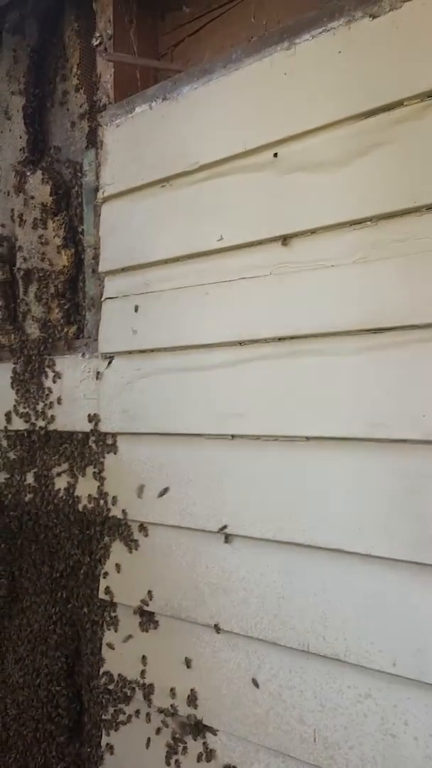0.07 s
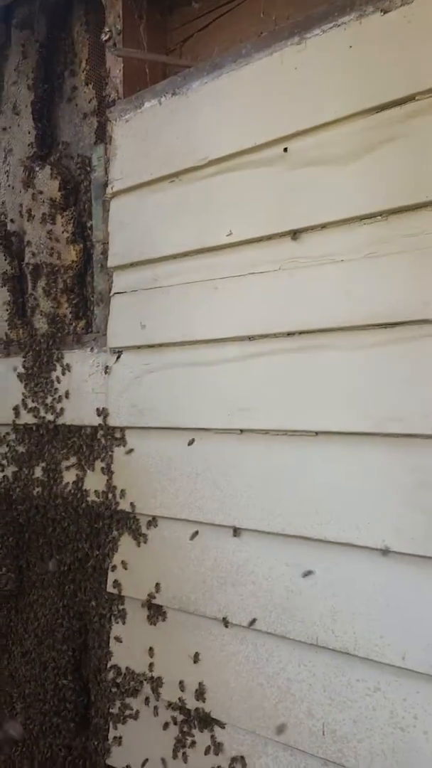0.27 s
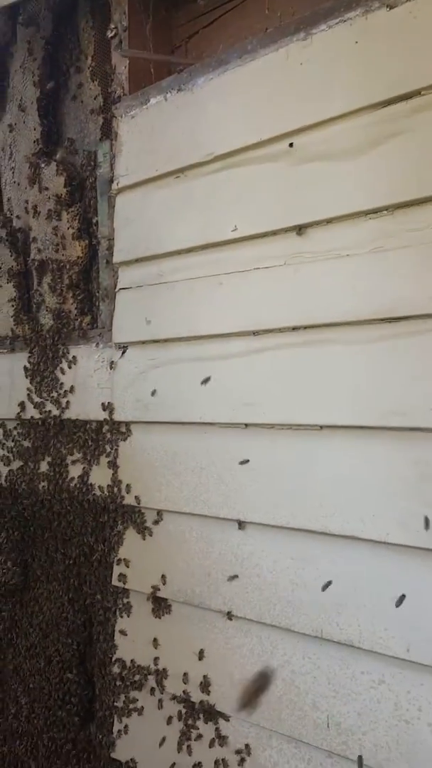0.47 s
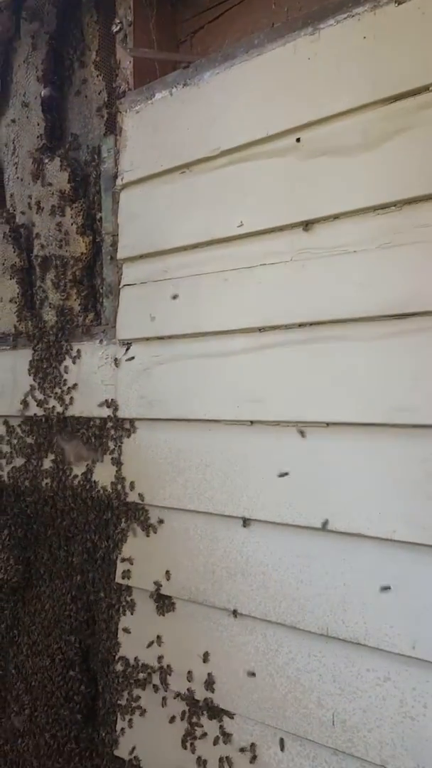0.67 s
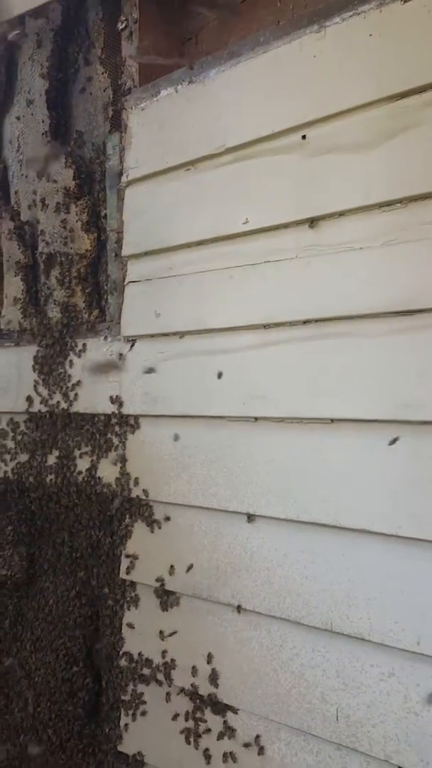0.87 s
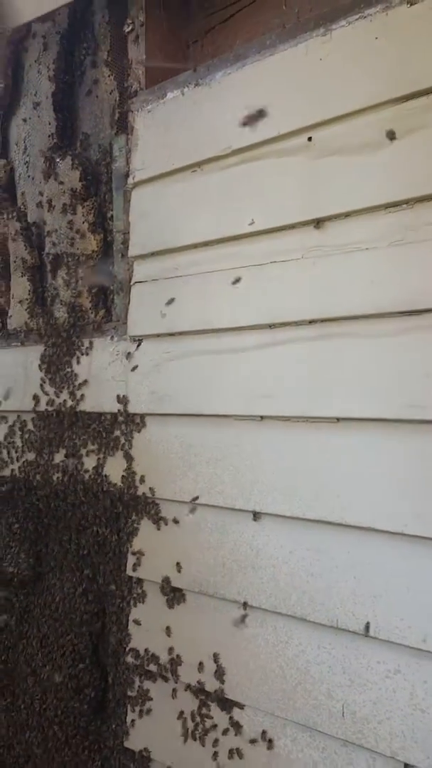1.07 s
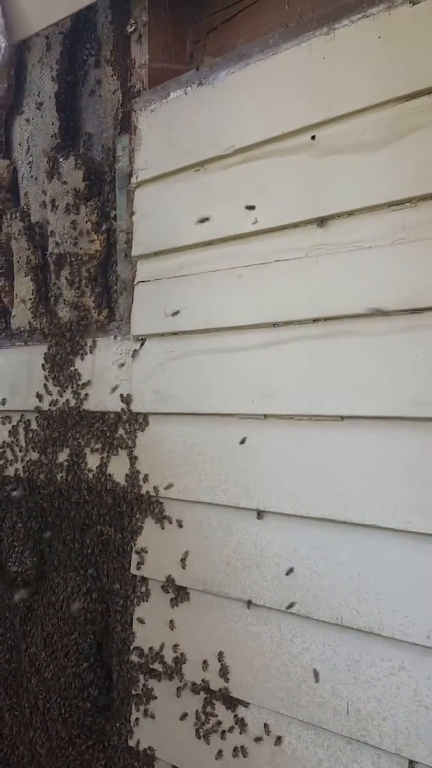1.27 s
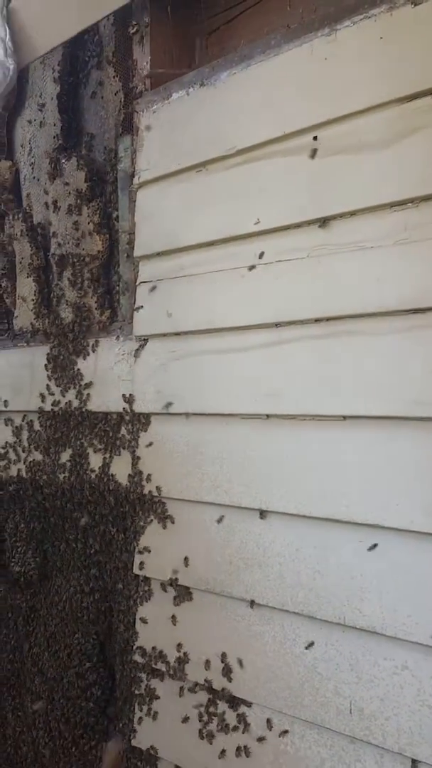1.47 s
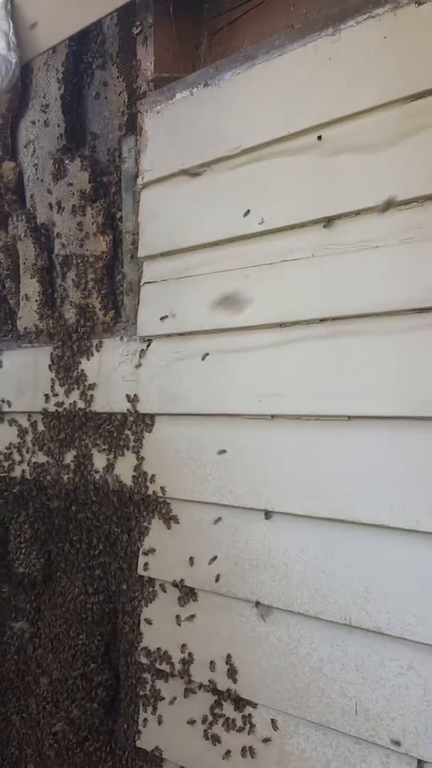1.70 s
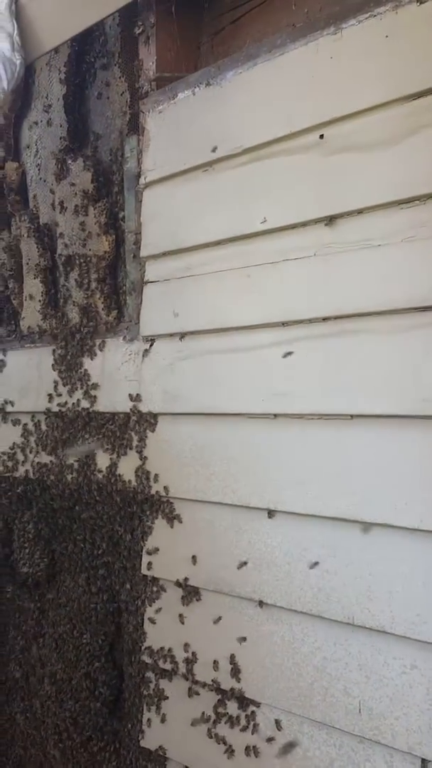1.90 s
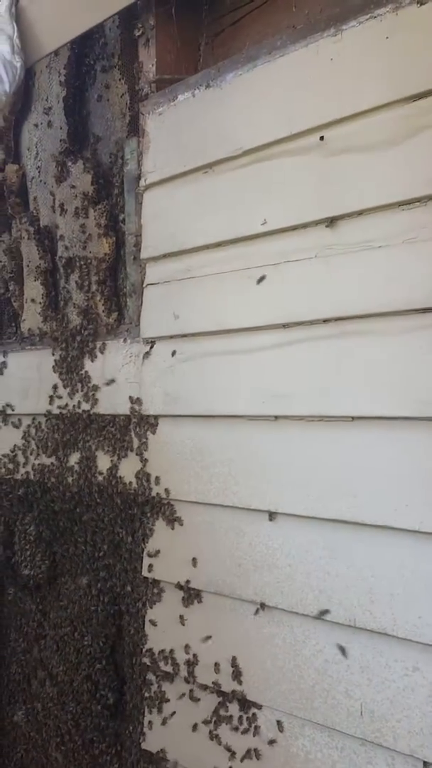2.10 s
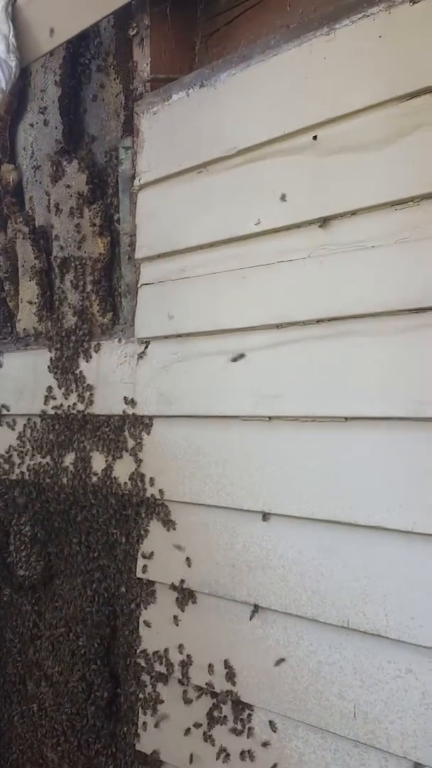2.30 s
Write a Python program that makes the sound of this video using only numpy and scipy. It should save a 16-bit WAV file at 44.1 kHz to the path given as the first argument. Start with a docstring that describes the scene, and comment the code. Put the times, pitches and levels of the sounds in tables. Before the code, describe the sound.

Bees buzzing close by, with sharp irregular taps and hollow thuds on a wooden wall.

```python
"""At the board wall of an old house, a honeybee swarm hums close by.
Wingbeats buzz over a rustle of wings and air and a distant rumble; single bees fly past.
Sharp, irregular taps and cracks of dry wood cut through. Heavier blows ring the boards and
make the hollow wall thud and boom; two end in gritty scrapes. The whole background dips after
heavy knocks, as under a recorder's gain control. The treble sits to the right."""
import sys
import numpy as np
from scipy.fft import rfft, irfft, next_fast_len
from scipy.io import wavfile
from scipy.ndimage import uniform_filter1d, map_coordinates

SR = 44100
rng = np.random.default_rng(int(sys.argv[2]) if len(sys.argv) > 2 else 0)


def digitize_waveform(pressure):
    """Quantize a signal to 16-bit integers and store it at the path in sys.argv[1].

    Rows of a 2-D input are taken as channels; values are limited to [-1, 1].
    """
    field = np.atleast_2d(pressure).T
    bounded = np.clip(field, -1, 1)
    quanta = np.round(bounded * 32767).astype(np.int16)
    wavfile.write(sys.argv[1], SR, quanta)


N = 108045
T = np.arange(N) / SR

# level of the whole background, dipping after heavy knocks: time_s, hum_rumble_gain_db, rustle_gain_db
BACKGROUND_LEVELS = [(0, -30.5, -46.5), (.11, -32.5, -44.5), (.2, -37, -45.5), (.42, -42, -43),
                     (.54, -43.5, -48), (.72, -43, -51), (.95, -44.5, -51.5), (1.15, -42, -52.5),
                     (1.28, -44, -48.5), (1.38, -39, -46.5), (1.45, -37, -47), (1.569, -45.5, -53),
                     (1.72, -47.5, -54), (1.9, -47, -55.5), (2.1, -47, -53), (2.3, -44, -49),
                     (2.45, -38, -46)]
# overtone envelope of one bee: freq_hz, level_db
BUZZ_SPECTRUM = [(230, 0), (420, 1.5), (510, 0), (660, -8), (850, -3), (1050, -11), (1300, -7.5),
                 (1800, -13), (2600, -29.5), (4000, -27), (6000, -24.5)]
# distant outdoor rumble: freq_hz, density_db
RUMBLE_SPECTRUM = [(20, -29), (45, -2), (75, 6), (130, 6.5), (180, -1), (400, -38)]
# rustle of wings and air: freq_hz, density_db
RUSTLE_SPECTRUM = [(100, -35), (300, 9), (700, 10.5), (1500, 6), (2600, 0), (5000, -4.5), (7400, -2),
                   (8300, -9.5), (9400, -15.5), (10500, -11.5), (12000, -2.5), (15600, -6.5)]
# pan of rumble and rustle: freq_hz, left_minus_right_db
AIR_PAN = [(100, 0.5), (700, 1.5), (2400, -2.5), (4400, -13), (8000, -8.5), (15000, -18)]
# left-right likeness of rumble and rustle: freq_hz, correlation
AIR_CORRELATION = [(60, 1), (300, 0.77), (700, -0.32), (1400, -0.39), (3000, 0.26), (15000, -0.18)]
# passing bees: nearest_s, half_amplitude_s, wingbeat_hz, peak_db
BEE_PASSES = [(0.062, 0.052, 202.3, -42.5), (.09, 0.096, 246.7, -43), (.93, 0.054, 223.2, -54),
              (1.38, 0.067, 239.5, -45.5), (1.769, 0.056, 254, -58), (1.99, 0.074, 259, -51.5),
              (2.22, 0.1056, 220.8, -48), (2.42, 0.081, 261.5, -50.5)]
# taps: start_s, contact_s, snap_db, tilt_db_per_octave, clack_db, resonance_hz, resonance_db, ring_db
TAP_EVENTS = [(0.2329, 0.0056, -16.5, 1.5, -34, 6670, 6.5, -25.5),
              (0.2841, .005, -27.5, 2.5, -35.5, 1180, 12, -40),
              (0.3587, 0.0032, -23.5, 6, -29, 1060, 2, -39), (0.422, 0.0038, -33, 8, -53, 1800, 2, -54),
              (0.4343, 0.00633, -12.5, 0, -11, 710, 6.5, -14.5),
              (.5382, .004, -30, 2.5, -36, 1350, 14.5, -41.5), (0.572, 0.0028, -36, 6.5, -46, 1800, 3, -61),
              (0.693, .003, -33.5, 7.5, -55, 1780, 7, -52), (0.7237, 0.0036, -31, 3.5, -42, 2200, 6, -39),
              (0.751, 0.0074, -30, 9.5, -47, 1800, -1, -60),
              (0.7681, 0.0024, -13.5, 0.5, -13.5, 1300, 13, -25),
              (0.8548, 0.0055, -24, 9, -38.5, 2020, 7, -31.5),
              (0.864, 0.007, -30.5, -1, -29.5, 1320, 15.5, -34.5),
              (1.0862, 0.0089, -39.5, 1, -33.5, 1160, 13.5, -43),
              (1.1096, 0.0022, -21, 0, -19, 1930, 16, -56),
              (1.1131, 0.0017, -12.5, -1.5, -18.5, 1470, 1, -21),
              (1.162, 0.0025, -32.5, 7.5, -39, 1800, 0, -37),
              (1.1977, 0.0026, -28, 7.5, -53, 1800, 7, -36.5),
              (1.2339, 0.0061, -31.5, 4, -25, 1540, 11, -33),
              (1.2625, 0.0035, -27, 6, -33, 2170, 10, -37.5),
              (1.3282, 0.0058, -30, 1, -30, 1870, 8.5, -38.5),
              (1.3576, 0.0056, -31, 5.5, -32, 2440, 20, -32.5),
              (1.3798, 0.0055, -32.5, 7.5, -33, 2420, 4, -40), (1.4, 0.0069, -36.5, 10, -43, 2440, 14, -37),
              (1.4646, 0.0025, -16.5, 4, -23.5, 2820, 13, -23.5),
              (1.4665, 0.0041, -14.5, 1.5, -8, 1980, 13.5, -26),
              (1.725, 0.0024, -36.5, 16.5, -49, 1780, 16, -44),
              (2.277, 0.0058, -44, 11, -44, 1800, 7, -67.5), (2.367, 0.0024, -46, 5, -59, 1800, 6, -46),
              (2.432, 0.0045, -41, 4, -54, 1800, -3, -58)]
# bright snap: freq_hz, density_db
SNAP_SPECTRUM = [(100, -16), (300, -27), (1500, -10.5), (3000, 1.5), (4300, 4.5), (5200, 1), (6300, 3),
                 (7600, 4.5), (8600, -7), (9800, -10), (12500, -5.5), (15800, -7)]
# woody clack: freq_hz, density_db
CLACK_SPECTRUM = [(30, -40), (70, -23), (140, -18), (270, 4.5), (650, 0), (1000, -3.5), (2300, -3.5),
                  (4000, -22), (9000, -38.5)]
# wood ringing or scraped: freq_hz, density_db
WOOD_SPECTRUM = [(60, -30), (150, 9.5), (500, 3), (1100, 4), (2000, 3.5), (3500, -1), (5000, -2.5),
                 (7400, -1.5), (9600, -16.5), (12500, -4.5), (15800, -9.5)]
# pan of wood noises: freq_hz, left_minus_right_db
WOOD_PAN = [(100, 0.5), (600, 2.5), (1300, -4.5), (2500, 1), (5000, -6.5), (8000, -12), (14000, -11.5)]
# left-right likeness of wood noises: freq_hz, correlation
WOOD_CORRELATION = [(60, 1), (300, 0.85), (700, 0.4), (1400, 0.14), (2100, 0.22), (4000, 0.19), (15000, 0)]
# blows on the wall: start_s, modes_db, pitch_ratio, swell_s, rattle_db, boom_db
THUD_EVENTS = [(.238, -51, 1.05, 0.0037, -47, -51), (.437, -8.5, 1, 0.0077, -13, -24.5),
               (.52, -61, 0.88, 0.006, -48, -33.5), (.785, -20, 1.17, 0.0059, -26, -27.5),
               (0.865, -31.5, 1.1, 0.0038, -37, -40), (1.113, -23, .78, 0.014, -22.5, -51),
               (1.235, -34.5, 1.15, 0.0015, -28, -54), (1.47, -10, 1.04, 0.015, -14.5, -24.5)]
# board modes: base_hz, level_db, t60_s
BOARD_MODES = [(132.5, -16.5, 0.29), (175, -13, 0.13), (220.7, -0.5, .16), (293.6, -9, 0.15),
               (331.5, -6, 0.1), (405, -17.5, 0.11), (481, -12, 0.12), (562.3, -10.5, 0.14),
               (633, -6, 0.08), (709, -11, 0.046)]
# rattle of the hollow: freq_hz, density_db
RATTLE_SPECTRUM = [(25, -42), (50, -31), (110, -7), (170, 1), (330, 2), (600, -4), (800, -9), (1300, -27),
                   (3000, -40)]
# boom of the wall: freq_hz, density_db
BOOM_SPECTRUM = [(20, -29), (42, -25), (68, 1), (95, -3.5), (125, -4), (220, -26), (500, -75)]
# scrapes after a blow: centre_s, sigma_s, peak_db
SCRAPE_EVENTS = [(0.804, 0.03, -33.5), (0.843, 0.021, -44.5), (1.494, 0.018, -30.5), (1.541, 0.022, -47)]


def amp(db):
    """Decibels to gain."""
    return 10 ** (np.asarray(db) / 20)


def unit(x):
    """Scale to rms 1."""
    return x / np.sqrt(np.mean(x ** 2) + 1e-20)


def along(points, hz):
    """Interpolate (freq_hz, value) points on a log axis."""
    freq_hz, values = np.transpose(points)
    return np.interp(np.log(hz + 1), np.log(freq_hz + 1), values)


def wobble(rate_hz, size=N):
    """Smooth random curve, rate_hz knots a second."""
    knots = rng.standard_normal(N // 8)[:int(size * rate_hz / SR) + 4]
    coarse = np.arange(0, size + 8, 8)
    spline = map_coordinates(knots, [coarse * rate_hz / SR], mode="nearest")
    return np.interp(np.arange(size), coarse, spline)


def noise(spectrum, pan=WOOD_PAN, correlation=WOOD_CORRELATION, envelope=np.ones(N),
          peak_hz=1000, peak_db=0, tilt_db=0, width_octaves=.19):
    """Stereo noise, rms 1, bunched under an envelope; optional resonance, tilt per octave above 1 kHz."""
    m = next_fast_len(len(envelope), True)
    hz = np.fft.rfftfreq(m, 1 / SR)
    resonance = np.exp(-.5 * (np.log2((hz + 1) / peak_hz) / width_octaves) ** 2)
    db = along(spectrum, hz) + peak_db * resonance + tilt_db * np.log2(np.maximum(hz / 1000, 1))
    bunched = envelope * rng.standard_normal((2, len(envelope)))
    white = np.exp(1j * np.angle(rfft(bunched, m)))
    spread_rad = np.arccos(np.clip(along(correlation, hz), -1, 1)) / 2
    mid, side = white * amp(db) * [np.cos(spread_rad), np.sin(spread_rad)]
    gains = amp(along(pan, hz) * np.array([[.5], [-.5]]))
    gains /= np.sqrt(np.mean(gains ** 2, axis=0))
    return unit(irfft(np.array([mid + side, mid - side]) * gains, m)[:, :len(envelope)])


def burst(spectrum, envelope, **colour):
    """Coloured noise burst with the envelope's energy."""
    sound = noise(spectrum, envelope=envelope, **colour) * envelope ** .31  # trims the smeared tail
    return unit(sound) * np.sqrt(np.mean(envelope ** 2))


def fade(t, swell_s, t60_s):
    """Swell, then exponential decay."""
    return (1 - np.exp(-t / swell_s)) * np.exp(-np.log(1000) * t / t60_s)


def add(track, start_s, sound):
    """Mix a sound into the track."""
    part = track[:, round(start_s * SR):][:, :sound.shape[-1]]
    part += sound[..., :part.shape[1]]


def buzz(pitch_hz, bend, jitter=.0098, lag_spread_s=.0003, harmonics=24, size=2048):
    """One bee, rms 1: a harmonic wingbeat that bends and jitters, reaching one side first."""
    k = np.arange(1, harmonics + 1)[:, None]
    phases = k * np.arange(size) / size + rng.random((harmonics, 1))
    beat = unit(np.sum(amp(along(BUZZ_SPECTRUM, k * pitch_hz)) * np.sin(2 * np.pi * phases), axis=0))
    cycles = np.cumsum(pitch_hz * (1 + bend + jitter * wobble(60))) / SR
    lag_cycles = pitch_hz * lag_spread_s * rng.normal() * np.array([[.5], [-.5]])
    return beat[((cycles + lag_cycles) * size).astype(int) % size]


def bees(count=22, wingbeat_hz=233, spread=.09, drift=.045):
    """Many bees, each with its own wandering wingbeat; the sum is held at a steady level."""
    out = np.zeros((2, N))
    for rank in (np.arange(count) + .5) / count:
        pitch_hz = wingbeat_hz * (1 + spread * np.log(rank / (1 - rank)) / 2)
        out += buzz(pitch_hz, drift * wobble(rate_hz=5))
    power = uniform_filter1d(np.mean(out ** 2, axis=0), size=8192)
    return unit(out / np.sqrt(power))


def background():
    """Swarm hum, rumble and rustle; set gain curves dip after heavy knocks, then slowly recover."""
    time_s, hum_rumble_gain_db, rustle_gain_db = np.transpose(BACKGROUND_LEVELS)
    hum = amp(-4.5) * bees() * amp([[1], [-1]])  # slightly left
    rumble = amp(-14) * noise(RUMBLE_SPECTRUM, AIR_PAN, AIR_CORRELATION)
    rustle = amp(5 + .91 * wobble(70)) * noise(RUSTLE_SPECTRUM, AIR_PAN, AIR_CORRELATION)
    hum_rumble_gain = amp(np.interp(T, time_s, hum_rumble_gain_db))
    rustle_gain = amp(np.interp(T, time_s, rustle_gain_db))
    return hum_rumble_gain * (hum + rumble) + rustle_gain * rustle


def fly_bys(doppler=.02):
    """Near bees swell and fade, sharp on approach and flat on leaving."""
    out = np.zeros((2, N))
    for nearest_s, half_amplitude_s, wingbeat_hz, peak_db in BEE_PASSES:
        position = (T - nearest_s) / half_amplitude_s
        bend = -doppler * position / np.hypot(1, position)
        out += amp(peak_db) / (1 + position ** 2) * buzz(wingbeat_hz, bend)
    return out


def taps(attack_s=.00054, release_t60_s=.0084, splinter_db=1.1, size=2048):
    """Milliseconds of splintery contact: bright snap and woody clack, then a short ring."""
    out, t = np.zeros((2, N)), T[:size]
    tail = fade(T[:SR // 4], swell_s=.0034, t60_s=.15)
    for start_s, contact_s, snap_db, tilt_db, clack_db, peak_hz, peak_db, ring_db in TAP_EVENTS:
        release = np.exp(-np.log(1000) * np.maximum(t - contact_s, 0) / release_t60_s)
        contact = (1 - np.exp(-t / attack_s)) * release
        roughness = amp(splinter_db * wobble(1600, size))
        splinters = unit(contact * roughness) * np.sqrt(np.mean(contact ** 2))
        snap = burst(SNAP_SPECTRUM, splinters, peak_hz=peak_hz, peak_db=peak_db, tilt_db=tilt_db)
        clack = burst(CLACK_SPECTRUM, contact, peak_hz=peak_hz, peak_db=peak_db)
        ring = burst(WOOD_SPECTRUM, tail, peak_hz=peak_hz, peak_db=peak_db / 2, tilt_db=tilt_db / 2)
        add(out, start_s, amp(snap_db) * snap + amp(clack_db) * clack)
        add(out, start_s, amp(ring_db) * ring)
    return out


def thuds():
    """Heavy blows ring the boards, rattle the hollow behind them and leave a low boom."""
    out, t = np.zeros((2, N)), T[:SR // 2]
    for start_s, modes_db, pitch_ratio, swell_s, rattle_db, boom_db in THUD_EVENTS:
        modes = np.zeros(len(t))
        for base_hz, level_db, t60_s in BOARD_MODES:
            envelope = amp(level_db + rng.normal(0, 1)) * fade(t, swell_s, t60_s)
            modes += envelope * np.sin(2 * np.pi * (base_hz * pitch_ratio * t + rng.random()))
        rattle = burst(RATTLE_SPECTRUM, fade(t, swell_s, t60_s=.15))
        boom = burst(BOOM_SPECTRUM, fade(t, swell_s=.025, t60_s=.3))
        add(out, start_s, amp(modes_db) * modes + amp(rattle_db) * rattle + amp(boom_db) * boom)
    return out


def scrapes(grit_db=3):
    """Wood rubs briefly on wood."""
    strokes = sum(amp(peak_db) * np.exp(-.5 * ((T - centre_s) / sigma_s) ** 2)
                  for centre_s, sigma_s, peak_db in SCRAPE_EVENTS)
    grit = amp(grit_db * wobble(400))
    return strokes * unit(grit * noise(WOOD_SPECTRUM))


def scene():
    """Bees and struck wall."""
    return background() + fly_bys() + taps() + thuds() + scrapes()


def record(dry):
    """Clip at full scale, then low-pass."""
    cutoff_hz = 15900
    m = next_fast_len(N + 8192, True)
    passband = np.fft.rfftfreq(m, 1 / SR) < cutoff_hz
    return irfft(rfft(np.clip(dry, -1, 1), m) * passband, m)[:, :N]


dry = scene()
out = record(dry)
digitize_waveform(out)
```